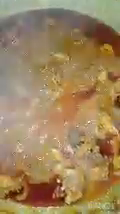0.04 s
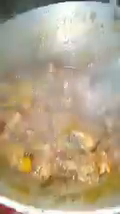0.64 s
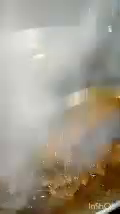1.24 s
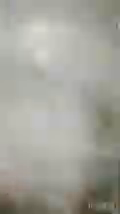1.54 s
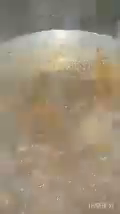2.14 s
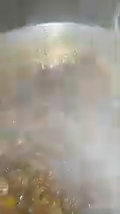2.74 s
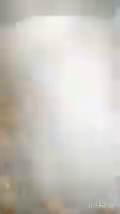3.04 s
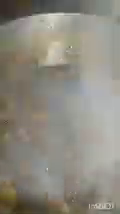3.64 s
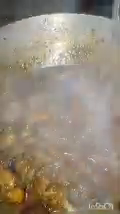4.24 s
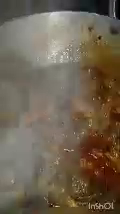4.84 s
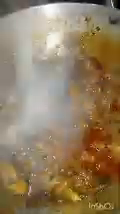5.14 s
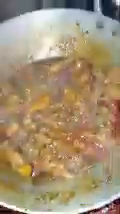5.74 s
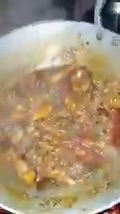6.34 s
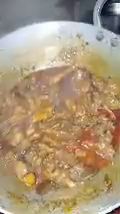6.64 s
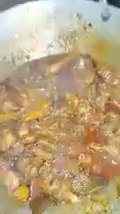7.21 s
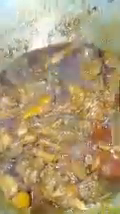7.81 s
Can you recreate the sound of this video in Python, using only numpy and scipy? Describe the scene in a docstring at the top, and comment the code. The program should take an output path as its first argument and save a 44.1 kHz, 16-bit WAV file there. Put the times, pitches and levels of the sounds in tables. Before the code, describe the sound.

Curry sizzles and pops in a metal pan, with sharp splutters of water on hot fat, then a thin steam whistle.

```python
"""A thin steam whistle, pops and plops over sizzling oil: curry simmers in a wide metal pan near a phone.
The sound cuts out early for 0.8 s. Water then meets hot fat and splutters three times, ringing the
pan and pockets in the food. Later, steam sings through small gaps in the gravy and the phone is bumped
softly. Throughout, fine bubbles sizzle in the oil, single ones pop, slow ones plop in the thick gravy."""
import sys
import numpy as np
from scipy import signal
from scipy.fft import rfft, irfft, next_fast_len
from scipy.io import wavfile
from scipy.ndimage import uniform_filter1d, map_coordinates

SR = 44100
rng = np.random.default_rng(int(sys.argv[2]) if len(sys.argv) > 2 else 0)


def store_pcm(level_fs):
    """Save levels as 16-bit WAV."""
    pcm = np.round(np.clip(level_fs, -1, 1) * 32767).astype(np.int16)
    wavfile.write(sys.argv[1], SR, np.atleast_2d(pcm).T)


N = 351477
MUTE_START_S, MUTE_END_S = 0.331, 1.141

# how hard the oil fries: time_s, level_db
SIMMER_LEVEL = [(0, -64), (0.32, -61), (1.3, -65.5), (2.7, -62.5), (2.95, -66), (3.9, -62.5), (4.3, -63),
                (4.9, -60.5), (6.3, -61.5), (7.95, -61.5)]
# spray spectrum: freq_hz, gain_db
SPRAY_SPECTRUM = [(100, -35.5), (350, -38), (900, -22), (1700, -22), (2200, -12), (2650, 3.5), (3700, 8.5),
                  (4400, 0), (5200, -20.5), (6500, -35), (9000, -53.5), (15500, -55.5)]
# pan resonances: freq_hz, width_hz, gain_db
PAN_MODES = [(373, 48, -2.5), (922, 190, -0.5), (1234, 41, 0), (1833, 430, -3), (2068, 20, 7.5),
             (2290, 260, 1)]
# resonant pockets in the food: freq_hz, width_hz, gain_db
POCKET_MODES = [(2767, 38, 0.5), (3010, 68, -1), (3340, 52, -14), (3667, 72, 2.5), (3900, 36, 4),
                (4186, 60, -1.5)]


def amp(db):
    """Decibels to gain."""
    return 10 ** (np.asarray(db) / 20)


def unit(x):
    """Scale to rms 1."""
    return x / np.sqrt(np.mean(x ** 2) + 1e-20)


def steady(x, span_samples):
    """Hold the running rms near 1, keeping the quick flicker."""
    return x / np.sqrt(np.abs(uniform_filter1d(x ** 2, size=span_samples)) + 1e-4)


def curve(rows):
    """Interpolate (time_s, value) rows at every sample."""
    return np.interp(np.arange(N) / SR, *np.transpose(rows))


def wobble(rate_hz):
    """Smooth random curve with rate_hz knots a second."""
    knots = rng.standard_normal(int(N * rate_hz / SR) + 4)
    return map_coordinates(knots, [np.arange(N) * rate_hz / SR])


def surge(t, hold_s, rise_db_per_s, fall_db_per_s):
    """Gain that climbs to 1 at t = 0, holds, then decays."""
    return amp(-rise_db_per_s * np.maximum(-t, 0) - fall_db_per_s * np.maximum(t - hold_s, 0))


def add(track, start_s, sound):
    """Mix a sound in at start_s."""
    part = track[max(round(start_s * SR), 0):][:len(sound)]
    part += sound[:len(part)]


def colour(x, spectrum, taps=2048):
    """Minimum-phase filter through (freq_hz, gain_db) points."""
    freq_hz, gain_db = np.transpose(spectrum)
    gain = amp(np.interp(np.log(np.fft.rfftfreq(taps, 1 / SR) + 1), np.log(freq_hz), gain_db))
    cepstrum = irfft(np.log(gain))
    cepstrum[1:taps // 2] *= 2
    cepstrum[taps // 2 + 1:] = 0
    return signal.fftconvolve(x, irfft(np.exp(rfft(cepstrum))))[:len(x)]


def resonate(x, modes):
    """Ring fixed modes, each squared for deep valleys between them; rms 1."""
    size = next_fast_len(N + SR // 2)
    f = np.fft.rfftfreq(size, 1 / SR)
    response = sum(amp(gain_db) * (2j * f * width_hz / (hz * hz - f * f + 2j * f * width_hz)) ** 2
                   for hz, width_hz, gain_db in modes)
    return unit(irfft(rfft(x, size) * response, size)[:N])


def cavity(x, pitch_hz, width_hz):
    """Steep resonance whose pitch may glide; rms 1."""
    carrier = np.exp(2j * np.pi * np.cumsum(pitch_hz) / SR)
    pole = np.exp(-np.pi * width_hz / SR)
    baseband = signal.lfilter([1], np.poly([pole, pole]), x / carrier)
    return unit((baseband * carrier).real)


def crackle(rate_hz, spread_db):
    """Impulses at random times, sizes uniform over +-spread_db; rms 1."""
    when, size, sign = rng.random((int(rate_hz * N / SR), 3)).T
    impulses = amp(spread_db * (2 * size - 1)) * np.sign(sign - .5)
    return unit(np.bincount((when * N).astype(int), impulses, N))


def ping(pitch_hz, swell_cycles, glide=0):
    """Sine that swells to 1 and dies; its pitch rises by about the fraction glide."""
    t = np.arange(int(16 * swell_cycles * SR / pitch_hz)) / SR
    age = t * pitch_hz / swell_cycles
    freq_hz = pitch_hz * (1 + glide * np.tanh((age - 1) / 4))
    return age * np.exp(1 - age) * np.sin(2 * np.pi * np.cumsum(freq_hz) / SR)


def pings(rows, swell_cycles, glide=0, gain_db=0):
    """One ping per (start_s, level_db, pitch_hz) row."""
    out = np.zeros(N)
    for start_s, level_db, pitch_hz in rows:
        add(out, start_s, amp(level_db + gain_db) * ping(pitch_hz, swell_cycles, glide))
    return out


def stray_bubbles(count, centre_hz, log_spread, floor_db, range_db):
    """Random (start_s, level_db, pitch_hz) rows, mostly faint."""
    when, size, pitch = rng.random((count, 3)).T
    pitch_hz = centre_hz * np.exp(log_spread * (2 * pitch - 1))
    return np.transpose([when * N / SR, floor_db + range_db * size ** 3, pitch_hz])


def handling(rub_gain_db=-11, rub_decay_s=0.061):
    """Fingers bump and rub the phone; its case ticks."""
    # soft bumps: start_s, level_db, pitch_hz
    bumps = [(5.067, -54, 290), (5.122, -64, 205), (5.17, -62, 156), (5.244, -59.5, 148),
             (5.386, -57.5, 210), (5.504, -60, 283), (5.723, -60.5, 164)]
    # dry ticks: start_s, level_db
    ticks = [(2.685, -45), (5.503, -35.5), (5.56, -35)]
    # case response: freq_hz, gain_db
    case_spectrum = [(40, -22), (200, 14), (700, 16), (2000, -14), (15500, -9.5)]
    # finger friction: freq_hz, gain_db
    rub_spectrum = [(50, -28.5), (130, 5.5), (280, 4), (600, -8.5), (1200, -29), (4000, -51)]
    clicks, pressure, t = np.zeros(N), np.zeros(N), np.arange(SR // 5) / SR
    for start_s, level_db in ticks:
        clicks[round(start_s * SR)] = amp(level_db)
    for start_s, level_db, _ in bumps:
        add(pressure, start_s - .01, amp(level_db + rub_gain_db) * np.exp(-t / rub_decay_s))
    rubbing = pressure * unit(colour(rng.standard_normal(N), rub_spectrum))
    return pings(bumps, swell_cycles=0.97, gain_db=-5) + rubbing + colour(clicks, case_spectrum)


def gravy(churn_db=-70.5, opening_boost_db=4):
    """Thick sauce plops and churns; the churn is louder before the cut-out."""
    # churning sauce: freq_hz, gain_db
    churn_spectrum = [(25, -9), (70, -8.5), (120, -5.5), (200, 2.5), (450, -1), (800, -0.5), (1300, -5.5),
                      (2200, -1.5), (4000, -24), (8000, -28.5), (15500, -32)]
    # big slow bubbles: start_s, level_db, pitch_hz
    plops = [(0.06, -58, 1470), (0.086, -61, 1126), (0.106, -60, 718), (0.13, -52, 1180),
             (0.199, -61, 1180), (3.0, -56, 880), (3.082, -59, 1370), (3.126, -58.5, 970),
             (3.356, -61.5, 830), (3.659, -58.5, 1090), (4.588, -62, 620), (5.483, -63, 1030),
             (6.501, -63.5, 795), (7.013, -64, 640), (7.456, -59.5, 940), (7.709, -62, 777)]
    level = amp(churn_db + opening_boost_db * (np.arange(N) / SR < MUTE_START_S))
    churn = level * unit(colour(crackle(rate_hz=6000, spread_db=7), churn_spectrum))
    faint = stray_bubbles(count=70, centre_hz=816, log_spread=0.46, floor_db=-72, range_db=12.5)
    return (churn + pings(plops, swell_cycles=1.68, glide=0.15, gain_db=4)
            + pings(faint, swell_cycles=0.61, glide=0.087, gain_db=2.5))


def frying(gain_db=4.4, flutter_db=1, clump_db=1.5):
    """Small bubbles burst in the oil in clumps; the smallest merge into hiss."""
    # sizzling oil: freq_hz, gain_db
    sizzle_spectrum = [(900, -38.5), (1800, -31.5), (2200, -17.5), (2500, -5.5), (3200, -1.5), (4000, 3.5),
                       (4400, -6.5), (5000, -12), (6000, -20.5), (7200, -26), (8500, -36.5), (11000, -43),
                       (15500, -47)]
    bursts = crackle(rate_hz=2200, spread_db=9) + .55 * rng.standard_normal(N)
    clumps = amp(clump_db * wobble(rate_hz=110))
    sizzle = unit(colour(bursts * clumps, sizzle_spectrum))
    return sizzle * amp(curve(SIMMER_LEVEL) + gain_db + flutter_db * wobble(rate_hz=25))


def pops_and_puffs(accent_gain_db=2.13):
    """Bubble pops and short ringing puffs of steam, over fainter pops that follow the simmer level."""
    # loudest bubble pops and short ringing puffs of steam: start_s, level_db, pitch_hz, swell_cycles
    accents = [(0.1194, -34.5, 3900, 3.5), (0.1575, -37, 3930, 2.4), (0.2072, -43, 2860, 1.1),
               (1.475, -40.5, 2820, 2.7), (1.4922, -34.5, 4560, 0.78), (2.209, -39, 3930, 2.5),
               (2.2465, -38.5, 3040, 0.66), (2.2794, -41, 2730, 0.82), (2.3273, -39, 4070, 2.8),
               (2.5307, -34.5, 3980, 0.99), (2.662, -41, 3040, 0.86), (2.7697, -35.5, 2920, 0.72),
               (3.538, -30.5, 4050, 1.8), (3.8798, -34.5, 3080, 0.7), (4.1172, -35.5, 2810, 1.6),
               (4.3364, -40, 2470, 2.6), (4.6899, -40.5, 4080, 0.94), (4.754, -35, 3460, 2),
               (5.039, -35.5, 3230, 1.6), (5.125, -38.5, 3370, 1.8), (5.2054, -39, 3440, 2.4),
               (5.8784, -34, 3894, 8.7), (5.9328, -32, 3810, 6.3), (5.997, -36.5, 3590, 2.4),
               (6.164, -36, 3950, 7.7), (6.2033, -31, 3660, 2.2), (6.43, -42.5, 3070, 1.6),
               (6.7115, -41, 3360, 2.4), (6.9596, -34.5, 3330, 1.7), (7.104, -41.5, 2510, 2.3),
               (7.2213, -43, 2990, 2.3), (7.517, -39, 2750, 2.2), (7.538, -31.5, 3840, 3),
               (7.9549, -33.5, 3700, 1.3)]
    # tone on leaving the food: freq_hz, gain_db
    exit_spectrum = [(1200, -11), (2000, -5.5), (2500, 0), (4300, 1), (6000, -2), (12000, -4)]
    crowd = stray_bubbles(count=600, centre_hz=3507, log_spread=0.32, floor_db=-56.5, range_db=9)
    snaps = stray_bubbles(count=55, centre_hz=3160, log_spread=0.28, floor_db=-46, range_db=7)
    simmer_db = curve(SIMMER_LEVEL)
    out = pings(crowd, swell_cycles=2) + pings(snaps, swell_cycles=1.3)
    out *= amp(simmer_db - simmer_db.mean())
    for start_s, level_db, pitch_hz, swell_cycles in accents:
        add(out, start_s, amp(level_db + accent_gain_db) * ping(pitch_hz, swell_cycles))
    return colour(out, exit_spectrum)


def steam(width_hz=160, gain_db=0.5, flutter_db=0.9, waver_hz=18):
    """Quick puffs of steam ring narrow gaps in the gravy, which open faster than they close."""
    # steam jets: start_s, hold_s, level_db, pitch_hz
    jets = [(0.0, 0.29, -56, 3850), (2.035, 0.0097, -37.5, 2593), (2.085, 0.12, -65.5, 2550),
            (2.2, 0.29, -59.5, 3860), (5.509, 0.027, -52, 3930), (5.625, 0.049, -52, 3820),
            (5.692, 0.0068, -46, 3800), (5.806, 0.04, -47, 3850), (5.886, 0.16, -43, 3920),
            (6.135, 0.015, -50, 3950), (6.204, 0.027, -45, 3917), (6.304, 0.13, -57.5, 3960),
            (6.788, 0.054, -53.5, 3750), (6.946, 0.053, -51, 3335), (6.95, 0.15, -50, 3886),
            (7.115, 0.29, -45.5, 3910), (7.12, 0.53, -59, 3390), (7.488, 0.36, -46.5, 3866),
            (7.925, 0.03, -50, 3833)]
    out, t = np.zeros(N), np.arange(N) / SR
    puffs = crackle(rate_hz=900, spread_db=4)
    detune_hz = waver_hz * wobble(rate_hz=14)
    flow = amp(gain_db + flutter_db * wobble(rate_hz=20))
    for start_s, hold_s, level_db, pitch_hz in jets:
        near = np.abs(t - start_s - hold_s / 2) < hold_s / 2 + .3
        ring = steady(cavity(puffs[near], pitch_hz + detune_hz[near], width_hz), span_samples=2200)
        opening = surge(t[near] - start_s, hold_s, rise_db_per_s=419.5, fall_db_per_s=224)
        out[near] += amp(level_db) * opening * ring
    return flow * out


def boiling():
    """Dense crackle of water flashing to steam."""
    return crackle(rate_hz=2600, spread_db=8)


def drops(swell_db=19, fall_db=8.7, sag_s=0.047, fresh_s=0.044, upper_db=-8.5, pan_db=-13, pocket_db=-11):
    """A drop boils off in a ringing cavity; an upper mode, the pan and the pockets join in at first."""
    # water drops: start_s, swell_s, level_db, fall_s, end_hz, sag_hz, width_hz, upper_ratio, spray_db
    landings = [(3.124, 0.077, -38, 0.094, 3556, 60.4, 390, 1.477, -7.5),
                (3.501, 0.00087, -41, 0.14, 3814, 464, 262, 1.39, -17)]
    out = np.zeros(N)
    surroundings = amp(pan_db) * resonate(boiling(), PAN_MODES)
    surroundings += amp(pocket_db) * resonate(boiling(), POCKET_MODES)
    spray = unit(colour(boiling(), SPRAY_SPECTRUM))
    for start_s, swell_s, level_db, fall_s, end_hz, sag_hz, width_hz, upper_ratio, spray_db in landings:
        bursts = boiling()
        age_s = np.maximum(np.arange(N) / SR - start_s, 0)
        pitch_hz = end_hz + sag_hz * np.exp(-age_s / sag_s)
        fresh = np.exp(-(np.maximum(age_s - swell_s, 0) / fresh_s) ** 2)
        ring = steady(cavity(bursts, pitch_hz, width_hz), span_samples=1500)
        upper = amp(upper_db) * cavity(bursts, pitch_hz * upper_ratio, width_hz=380)
        envelope = (age_s > 0) * surge(age_s - swell_s, 0, swell_db / swell_s, fall_db / fall_s)
        out += amp(level_db) * envelope * (ring + fresh * (upper + surroundings) + amp(spray_db) * spray)
    return out


def spitting(gain_db=1.5, spray_gain=0.18, spray_t60_s=0.048):
    """Hot fat spits: a sharp crack, then a brief spray."""
    # spits of fat: start_s, level_db
    spits = [(1.514, -20), (1.5638, -15.5), (1.5892, -18), (1.5962, -17.5), (1.6917, -21.5),
             (1.8795, -17.5), (1.9066, -21), (2.0042, -27), (2.4338, -26.5), (3.2098, -18.5),
             (3.5014, -30.5)]
    out, t = np.zeros(N), np.arange(SR // 6) / SR
    for start_s, level_db in spits:
        burst = spray_gain * rng.standard_normal(len(t)) * amp(-60 * t / spray_t60_s)
        burst[0] = 2  # the crack
        spit = colour(burst, SPRAY_SPECTRUM)
        add(out, start_s, amp(level_db + gain_db) * spit / np.abs(spit).max())
    return out


def splutter(rise_db_per_s=517.5, linger_db=-11.5, spray_db=-3, pocket_db=-1.5, pan_db=-26):
    """Water on hot fat flares up and leaves a lingering sizzle; the crackle rings pockets and pan."""
    # flare-ups of boiling: crest_s, level_db
    flares = [(1.525, -47), (1.562, -31), (1.595, -28.5), (1.712, -33.5), (1.751, -40.5), (1.82, -43.5),
              (1.886, -34.5), (1.95, -40), (2.012, -41.5), (2.049, -35)]
    power, t = np.zeros(N), np.arange(N) / SR
    for crest_s, level_db in flares:
        near = np.abs(t - crest_s) < 1
        flare = surge(t[near] - crest_s, 0, rise_db_per_s, fall_db_per_s=395.5)
        linger = amp(linger_db) * surge(t[near] - crest_s, 0, rise_db_per_s, fall_db_per_s=75)
        power[near] += (amp(level_db) * (flare + linger)) ** 2
    spray = amp(spray_db) * unit(colour(boiling(), SPRAY_SPECTRUM))
    pockets = amp(pocket_db) * steady(resonate(boiling(), POCKET_MODES), span_samples=1500)
    pan = amp(pan_db) * resonate(boiling(), PAN_MODES)
    return np.sqrt(power) * (spray + pockets + pan)


def scene():
    """Pan and phone, mono."""
    pan = frying() + splutter() + spitting() + drops() + steam() + pops_and_puffs() + gravy()
    return (pan + handling())[None]


def record(dry, mute_db=-58, hiss_db=-99, offset_db=-46, offset_wait_s=0.054, offset_rise_s=0.06,
           cutoff_hz=15500):
    """Cut out to a trace of hiss, return with a soft click, low-pass."""
    t = np.arange(N) / SR
    muted = (t > MUTE_START_S) & (t < MUTE_END_S)
    hiss = amp(hiss_db) * unit(signal.lfilter([1], [1, -.97], rng.standard_normal(N)))
    # a DC offset builds while muted and snaps back: the click
    offset_age_s = np.maximum(t - MUTE_START_S - offset_wait_s, 0)
    offset = muted * amp(offset_db) * (1 - np.exp(-offset_age_s / offset_rise_s))
    mix = dry * np.where(muted, amp(mute_db), 1) + hiss + offset
    size = next_fast_len(N + SR // 2)
    passband = np.fft.rfftfreq(size, 1 / SR) < cutoff_hz
    return irfft(rfft(mix, size) * passband, size)[..., :N]


dry = scene()
out = record(dry)
store_pcm(out)
```